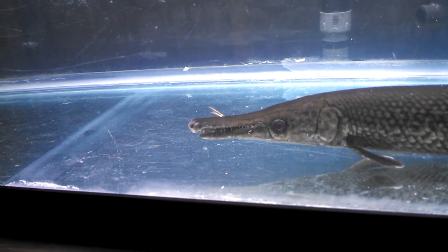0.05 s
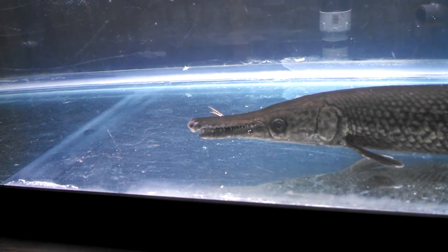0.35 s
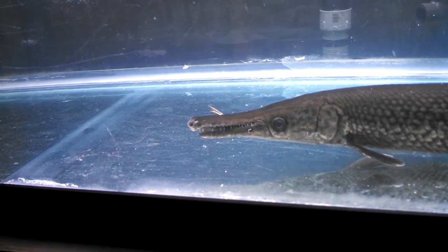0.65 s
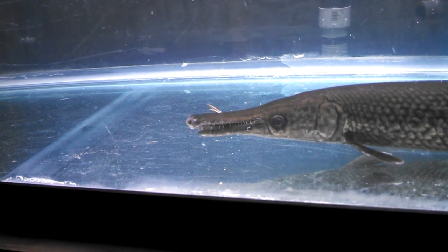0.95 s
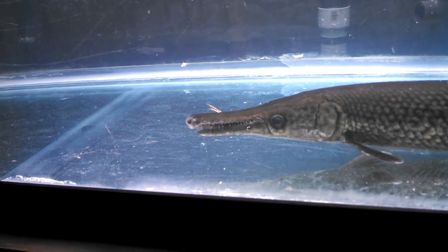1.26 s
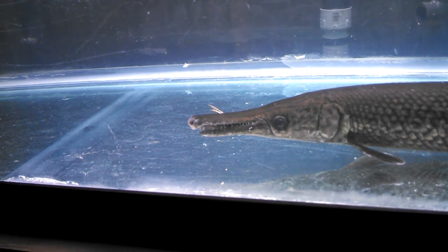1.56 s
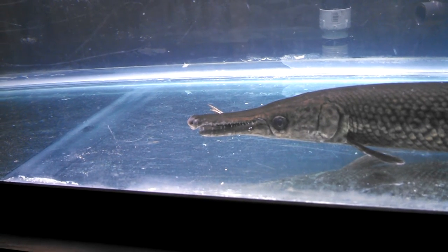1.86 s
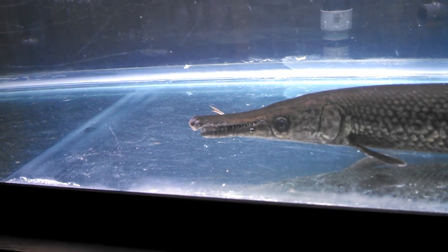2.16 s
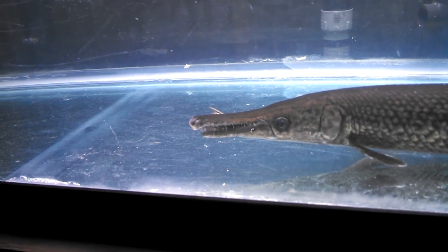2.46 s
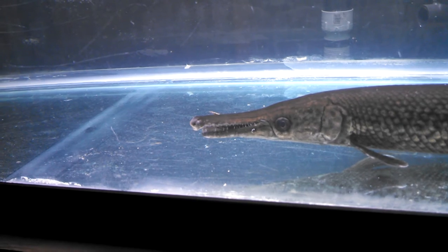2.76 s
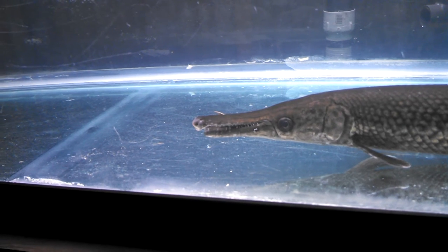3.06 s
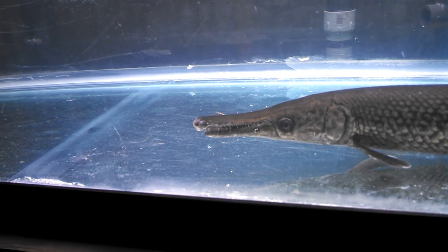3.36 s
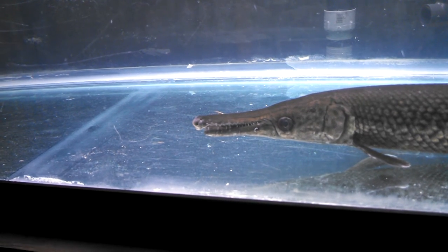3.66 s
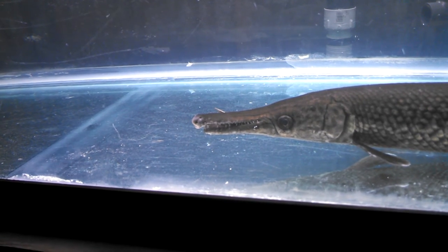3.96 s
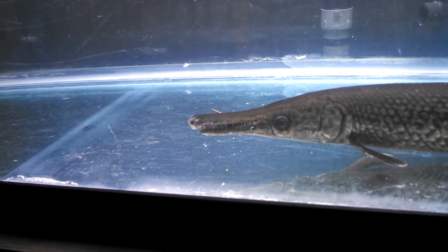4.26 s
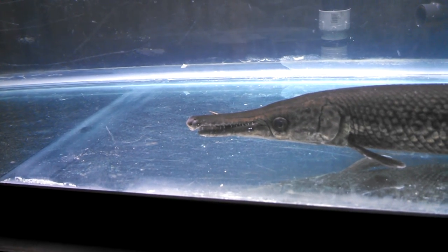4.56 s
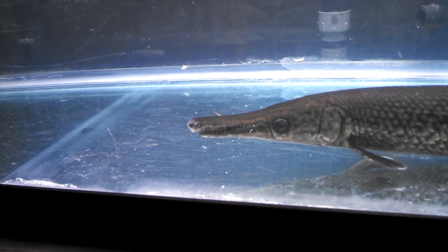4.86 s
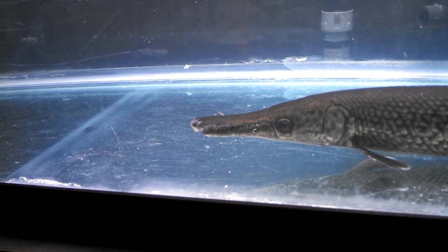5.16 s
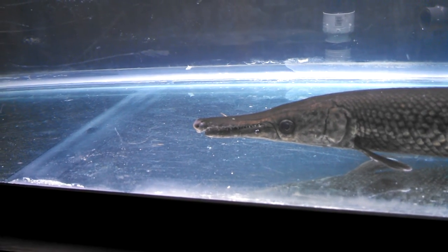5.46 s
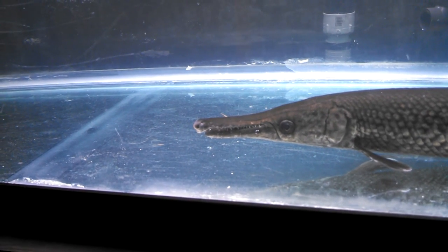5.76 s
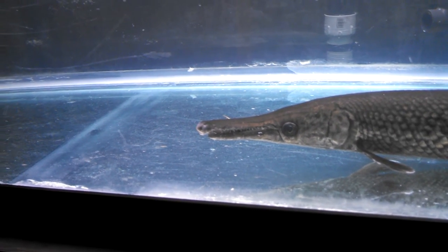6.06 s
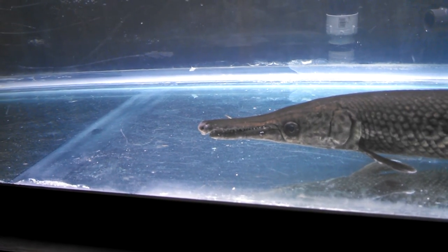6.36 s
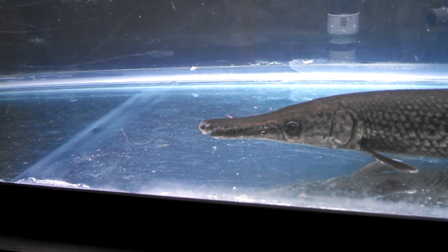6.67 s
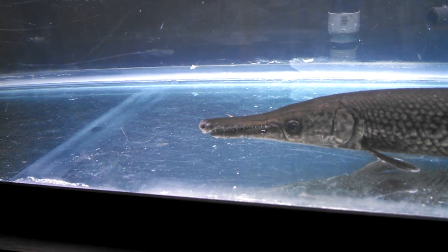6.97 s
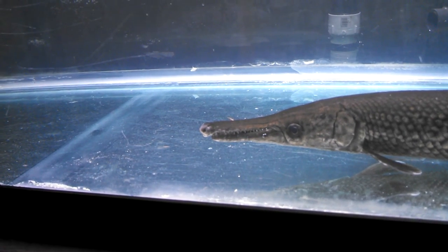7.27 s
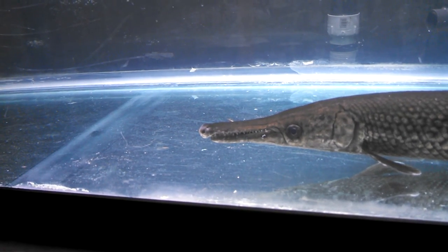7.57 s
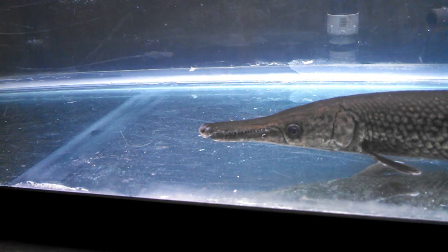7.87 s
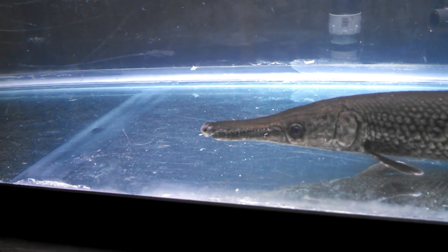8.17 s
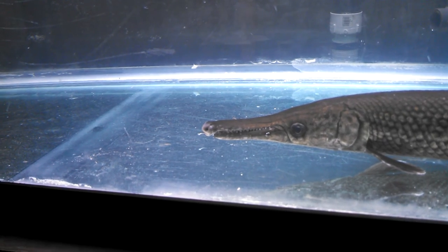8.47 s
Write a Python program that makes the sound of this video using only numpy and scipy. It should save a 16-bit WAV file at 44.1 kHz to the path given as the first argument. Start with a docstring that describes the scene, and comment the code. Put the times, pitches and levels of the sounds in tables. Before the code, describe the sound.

An aquarium filter runs without a break for about eight and a half seconds in a quiet room, heard close up in wide stereo. The pump holds a steady low electric hum with a faint, wavering chatter against the tank. Over it, the outflow makes an even rush of churning water and a bright, prickly fizz of tiny bursting bubbles. Small bubbles plop irregularly throughout, and spray gives brief, faint spits of hiss. The loudest plops come in quick clusters at about 4.7 and 5.8 seconds. Underneath, a low room rumble swells softly near 0.8 seconds, again near 4.3 seconds and once more around 7 seconds. The top of the fizz brightens slightly just after 8 seconds, while the hum and water carry on at the same level to the end.

```python
"""An aquarium filter runs in a quiet room. From the start its mains-driven pump hums and chatters faintly
against the tank, while the outflow rushes and fizzes under the hood, bubbles plop and spray spits.
The room's low rumble swells near 0.8 s and 4.3 s; the loudest plops cluster around 4.7 s and 5.8 s.
The rumble swells again near 7 s, and the top of the fizz brightens a little just after 8 s.
All is heard through two close microphone ports, widened by a delayed cross-feed."""
import sys
import numpy as np
from scipy import signal
from scipy.fft import rfft, irfft, next_fast_len
from scipy.io import wavfile
from scipy.ndimage import map_coordinates

SR = 44100
rng = np.random.default_rng(int(sys.argv[2]) if len(sys.argv) > 2 else 0)


def transcribe(signal):
    """Save signal, clipped to [-1, 1], as a 16-bit WAV file at the path in sys.argv[1]."""
    frames = np.atleast_2d(signal).T
    limited = np.clip(frames, -1, 1)
    pcm = np.round(limited * 32767).astype(np.int16)
    wavfile.write(sys.argv[1], SR, pcm)


N = 375727
MAINS_HZ = 60.02


def amp(db):
    """Decibels to gain."""
    return 10 ** (np.asarray(db) / 20)


def unit(x):
    """Scale to rms 1."""
    return x / np.sqrt(np.mean(x ** 2) + 1e-20)


def along(points, hz):
    """Read a curve of (frequency, value) points on a log frequency axis."""
    f, v = np.transpose(points)
    return np.interp(np.log(hz + 1), np.log(f + 1), v)


def wobble(per_s):
    """A smooth random modulator with per_s knots a second."""
    return map_coordinates(rng.standard_normal(int(N * per_s / SR) + 4), [np.arange(N) * per_s / SR])


def filtered(x, response):
    """EQ x with a gain given as a function of frequency."""
    m = next_fast_len(N + SR // 2)
    return irfft(rfft(x, m) * response(np.fft.rfftfreq(m, 1 / SR)), m)[..., :N]


def band(hz, centre_hz, octaves):
    """A bell-shaped band-pass curve."""
    return np.exp(-(np.log2((hz + 1) / centre_hz) / octaves) ** 2)


def add(track, s, sound):
    """Mix a sound into a track at time s."""
    part = track[..., max(round(s * SR), 0):][..., :sound.shape[-1]]
    part += sound[..., :part.shape[-1]]


def at_ports(pair, colour):
    """Colour two unrelated signals and give them the stereo image of the two ports."""
    # how alike the ports sound: (frequency [Hz], correlation [-1..1])
    alike = [(30, -0.61), (60, -0.99), (125, 0.29), (250, 0.25), (500, 0.66), (900, 0.42), (2000, -0.037),
             (15000, 0.058)]
    # shading of the right port: (frequency [Hz], left over right [dB])
    shade = [(3400, 0.5), (4800, 20), (6200, 3), (9000, 2), (10300, 20), (11700, 3), (13000, 6), (14500, 5)]
    width = lambda hz: np.arccos(np.clip(along(alike, hz), -1, 1)) / 2
    mid, side = filtered(pair, lambda hz: colour(hz) * np.array([np.cos(width(hz)), np.sin(width(hz))]))
    pan = lambda hz: np.arctan(amp(along(shade, hz)))
    balance = lambda hz: np.sqrt(2) * np.array([np.sin(pan(hz)), np.cos(pan(hz))])
    return filtered(np.array([mid + side, mid - side]), balance)


def noise_bed(colour):
    """Coloured stereo noise at the ports, rms 1."""
    return unit(at_ports(rng.standard_normal((2, N)), colour))


def room(x):
    """Glass and walls scatter a sound along a different path to each port."""
    # reverb decay: (frequency [Hz], time to fall 60 dB [s])
    decay = [(200, 0.52), (1500, 0.15), (12000, 0.081)]
    hz, t, spectrum = signal.stft(rng.standard_normal((2, SR // 3)), SR, nperseg=256)
    tail = signal.istft(spectrum * amp(-60 * t / along(decay, hz)[:, None]), SR, nperseg=256)[1]
    return signal.fftconvolve(x[None], tail / np.linalg.norm(tail[0]), axes=1)[:, :N]


def ring(t, hz, cycles, rise, lead=0):
    """A bubble rings for some cycles, its pitch rising as it nears the surface."""
    age = t * hz / cycles
    phase = 2 * np.pi * hz * t * (1 + rise * age / 2) + lead
    return np.sin(phase) * np.exp(-age) * (1 - np.exp(-t * hz))


def swarm(count, low_hz, high_hz, cycles, spread_db, tilt, bubble_gain, wash, grain_samples):
    """Rushing water and bubbles from ten spots, each with its own reverb, in an even wash; rms 1."""
    t, pair = np.arange(grain_samples) / SR, np.zeros((2, N))
    for _ in range(10):
        when, pitch, strength = rng.random((count // 10, 3)).T[..., None]
        hz = low_hz * (high_hz / low_hz) ** pitch
        accent = amp(-spread_db * np.log(np.maximum(strength, np.exp(-4))))
        grains = (hz / low_hz) ** tilt * accent * ring(t, hz, cycles, rise=0.013)
        places = (when * N).astype(int) + np.arange(grain_samples)
        bubbles = unit(np.bincount(places.ravel(), grains.ravel(), N)[:N])
        pair += room(rng.standard_normal(N) + bubble_gain * bubbles)
    return unit(unit(pair) + wash * rng.standard_normal((2, N)))


def rumble():
    """Room rumble through the stand and floor drifts in level; three times a narrow band swells."""
    # tone of the rumble: (frequency [Hz], relative level [dB])
    tone = [(20, -12), (38, -10), (56, 8.5), (82, 2.5), (110, -12), (200, -46)]
    # low swells: (time [s], level at the crest [dB], centre [Hz])
    swells = [(.83, -53, 56), (4.32, -47, 54), (6.98, -49, 80.5)]
    t, swell_s = np.arange(N) / SR, 0.17
    out = amp(-52.5 + 2 * wobble(6)) * noise_bed(lambda hz: amp(along(tone, hz)))
    for s, db, centre_hz in swells:
        boom = noise_bed(lambda hz: band(hz, centre_hz, octaves=0.4))
        out += amp(db) * np.exp(-((t - s) / swell_s) ** 2) * boom
    return out


def coil_hum():
    """The pump's coil hums at mains harmonics; the impeller's uneven load shakes level and phase."""
    # hum in the room's standing waves: (mains multiple, left [dB], right [dB], left lead [rad])
    harmonics = [(1, -69, -60.5, -4), (2, -55.5, -61.5, -2.5), (3, -45.5, -47, -0.23), (4, -55, -43, 2.5),
                 (5, -44.5, -45.5, 0.34), (6, -41.5, -42, 1.77), (7, -61.5, -57, -0.5), (8, -59, -58, -1.5),
                 (9, -54, -78, 1), (10, -53.5, -60, 0.5), (11, -57.5, -75, 0), (15, -62, -61.5, -0.5)]
    t, out = np.arange(N) / SR, np.zeros((2, N))
    flutter_db = 0.9 * wobble(20)
    for multiple, left_db, right_db, lead in harmonics:
        lag = 0.34 * multiple ** 2  # the tank delays the higher harmonics more
        phase = 2 * np.pi * multiple * MAINS_HZ * t - lag + 0.1 * wobble(20)
        partial = np.array([amp(left_db) * np.sin(phase + lead), amp(right_db) * np.sin(phase)])
        out += np.sqrt(2) * amp(flutter_db + 0.62 * wobble(2.07)) * partial
    return out


def impeller_chatter():
    """The loose impeller rocks, putting wavering sidebands beside the mains harmonics."""
    # rattle tones: (mains multiple, rattle multiple, left [dB], right [dB], left lead [rad])
    sidebands = [(3, -1, -60, -56, -.5), (3, 1, -61, -57, .3), (4, 1, -65, -63, 1.6), (5, -1, -61, -63, -1),
                 (5, 1, -62, -54.5, 0), (5, 2, -64, -61, -.2), (6, -1, -56.5, -52.5, -.4),
                 (6, 1, -57.5, -70, 3), (7, -1, -58.5, -64, 1.6), (7, 1, -67, -55.5, 2.9),
                 (8, -2, -61, -61, 1.1), (7, 2, -55.5, -61, 1.7), (8, -1, -61, -60, -.5),
                 (8, 1, -58.5, -64, -.2), (8, 2, -60, -67, -1.6), (10, 2, -60, -64, .2)]
    rattle_hz = 15.72
    t, out = np.arange(N) / SR, np.zeros((2, N))
    for multiple, side, left_db, right_db, lead in sidebands:
        hz = multiple * MAINS_HZ + side * rattle_hz
        phase = 2 * np.pi * (hz * t + rng.random()) + np.array([[lead], [0]]) + 0.39 * wobble(1.44)
        out += np.sqrt(2) * amp([[left_db], [right_db]]) * amp(1.3 * wobble(1.98)) * np.sin(phase)
    return out


def housing_drone():
    """Water drones steadily in the pump housing."""
    # tone of the drone: (frequency [Hz], relative level [dB])
    tone = [(60, -43), (105, -4), (130, -7.5), (168, 2.5), (215, -2), (230, -4.5), (246, 2), (270, -5),
            (340, -0.5), (400, -7), (470, -8), (600, -4), (1200, -26.5)]
    return amp(-41.5) * noise_bed(lambda hz: amp(along(tone, hz)))


def spray():
    """Spray spits in short bursts of hiss: a few clear ones among many faint ones of random pitch."""
    # clear spits: (time [s], level before trim [dB], centre [Hz], length [s], width [octaves])
    spits = [(0.09, -46, 5500, .025, .35), (0.185, -34.5, 12500, .04, 0.54),
             (0.185, -35.5, 4500, .025, 0.54), (.557, -36, 13000, .025, .4), (2.331, -35, 8000, 0.032, .6),
             (2.38, -35, 12000, 0.046, .6), (2.654, -36, 7500, 0.026, 0.41), (2.66, -42, 3900, 0.022, .25),
             (3.923, -32, 7000, 0.029, 1.7), (4.244, -33, 5400, 0.025, 0.6),
             (4.737, -34, 5330, 0.023, 0.28), (4.799, -38, 5800, 0.04, .25), (5.193, -33, 9200, .017, 0.24),
             (5.64, -32.5, 3500, .042, 0.41), (5.644, -35, 10000, .032, 0.58), (6.789, -37, 9000, .02, .3),
             (6.914, -38, 8500, 0.022, 0.27), (7.649, -37.5, 10200, .015, .2), (8.0, -37, 15000, .012, .2)]
    faint_per_s, low_hz, high_hz, trim_db = 22, 6000, 14000, -7
    t, out = np.arange(4096) / SR, np.zeros((2, N))
    bins_hz = np.fft.rfftfreq(len(t), 1 / SR)
    faint = []
    for when, strength, pitch in rng.random((faint_per_s * N // SR, 3)):
        db = -46.5 - np.log(max(strength, 0.05))
        faint.append((when * N / SR, db, low_hz * (high_hz / low_hz) ** pitch, 0.011, 0.3))
    for s, db, hz, length, octaves in list(spits) + faint:
        hiss = unit(irfft(rfft(rng.standard_normal((2, len(t)))) * band(bins_hz, hz, octaves)))
        age = 3 * t / length
        add(out, s, amp(db + trim_db) * age * np.exp(1 - age) * hiss)
    return at_ports(out, lambda hz: 1)


def plops():
    """Large bubbles gurgle at different places on the surface; each sheds three smaller ones."""
    # large bubbles: (time [s], level before the mix [dB], pitch [Hz], left lead [rad])
    bubbles = [(0.079, -35.5, 3293, -2.1), (0.243, -35, 1167, 0.1), (0.347, -37, 1417, 0),
               (0.396, -35, 1159, 0), (1.694, -37.5, 1186, -0.1), (1.881, -37, 1380, 0),
               (2.074, -36.5, 1633, 0.2), (2.704, -34.5, 1022, 0.2), (2.74, -34.5, 970, 0.2),
               (2.767, -36, 1288, -0.1), (3.022, -33, 3746, 0), (3.045, -34.5, 1030, 0.4),
               (3.128, -37.5, 1355, 0), (3.22, -36, 1633, 0.6), (3.593, -32.5, 1003, 0.6),
               (3.608, -34.5, 1202, 0), (4.098, -36.5, 1409, 0), (4.657, -36, 987, -0.2),
               (4.678, -36, 1440, 0), (4.7, -28, 1409, 0), (4.735, -33, 1480, 0.3),
               (4.756, -33.5, 1910, -0.5), (4.784, -34.5, 1360, 0), (4.826, -35, 1092, -0.4),
               (5.137, -38, 1527, 0), (5.362, -33, 1159, -0.1), (5.731, -36, 1398, 0),
               (5.751, -30, 1684, 1), (5.829, -29, 1073, 0), (5.84, -34, 860, 0.4),
               (5.871, -31.5, 849, 0.4), (5.92, -35, 860, 0.4), (6.163, -37, 1440, 0.3),
               (6.663, -36, 2200, 2.5), (6.887, -36, 1398, 0), (7.349, -34.5, 1918, -0.7),
               (7.519, -34, 1813, 1.4), (7.54, -35, 1400, 0), (8.097, -34, 1382, 0),
               (8.242, -36, 841, -0.3), (8.244, -35.5, 1159, -0.1)]
    shed_db, shed_span_s, shed_octaves = -10, 0.04, 0.2
    direct_db, reverb_db = -0.7, -4
    t, pair = np.arange(SR // 8) / SR, np.zeros((2, N))
    for s, db, hz, lead in bubbles:
        leads = np.array([[lead], [0]])
        add(pair, s, amp(db) * ring(t, hz, cycles=14, rise=0.003, lead=leads))
        for delay, pitch in rng.random((3, 2)):
            shed_hz = hz * 2 ** (shed_octaves * (2 * pitch - 1))
            blip = ring(t, shed_hz, cycles=7, rise=0.02, lead=leads)
            add(pair, s + shed_span_s * delay, amp(db + shed_db) * blip)
    return amp(direct_db) * pair + amp(reverb_db) * room(pair[0])


def fizz():
    """Tiny bubbles burst in a bright prickle whose top treble drifts and flickers."""
    # tone of the fizz: (frequency [Hz], relative level [dB])
    tone = [(1500, -38), (3400, 5), (4300, 1.1), (5800, -0.5), (7200, -2.5), (8700, 1), (9900, -6),
            (11000, -9.5), (12700, 2.5), (14000, 4), (15500, 0.5)]
    # fader ride on the top treble: (time [s], gain [dB])
    treble_ride = [(0, -0.5), (2.8, -0.5), (3.3, -1.5), (4, -0.5), (4.5, -1.5), (5.1, -0.5), (6.2, -1.5),
                   (7.6, -.1), (8.2, 2), (8.52, 0)]
    prickle = swarm(count=4000, low_hz=4980, high_hz=15400, cycles=2.2, spread_db=4, tilt=0.4,
                    bubble_gain=0.43, wash=0.55, grain_samples=200)
    sizzle = unit(at_ports(prickle, lambda hz: amp(along(tone, hz))))
    top = filtered(sizzle, lambda hz: hz > 10400)
    top_db = np.interp(np.arange(N) / SR, *np.transpose(treble_ride)) + wobble(30)
    return sizzle + (amp(top_db) - 1) * top


def churn():
    """Churning water full of small bubbles rings the air space under the hood."""
    # tone of the rushing water: (frequency [Hz], relative level [dB])
    tone = [(60, -49), (150, -4.5), (400, -8.5), (600, 0.5), (700, 0.5), (900, -1), (1300, -3.5),
            (1650, -4.5), (2000, -3), (2700, -3.5), (4200, -22), (8000, -21)]
    # peaks and dips of the air under the hood: (centre [Hz], width [Hz], gain [dB])
    hood = [(602, 20, 3), (689, 30, -4), (790, 40, -1.5), (850, 40, 0.5), (932, 26, 2.5), (995, 30, 1),
            (1085, 24, 1.2), (1119, 26, -3.5), (1165, 50, 1.5), (1313, 40, -3), (1405, 30, 5),
            (1625, 30, 2), (1755, 60, -2.5), (1797, 24, 3.5), (1991, 60, 2.5), (2101, 26, 2.5),
            (3505, 40, 4)]
    hood_db = lambda hz: sum(db / (1 + (2 * (hz - centre) / width) ** 2) for centre, width, db in hood)
    water = swarm(count=6000, low_hz=799, high_hz=3405, cycles=8, spread_db=2, tilt=0.89,
                  bubble_gain=0.4, wash=0.8, grain_samples=1400)
    return unit(at_ports(water, lambda hz: amp(along(tone, hz) + hood_db(hz))))


def outflow():
    """Churn and fizz surge gently together with the stream, each with a quicker flicker of its own."""
    surge_db = -0.5 * wobble(3.92)
    rush, sizzle = churn(), fizz()
    rush_db = -38 + surge_db + 0.4 * wobble(16)
    sizzle_db = -41 + surge_db + 1.26 * wobble(30)
    return amp(rush_db) * rush + amp(sizzle_db) * sizzle


def scene():
    """Pump, water and the room's rumble at the two ports."""
    pump = coil_hum() + impeller_chatter() + housing_drone()
    return pump + outflow() + plops() + spray() + rumble()


def record(dry):
    """Above the bass each channel loses a delayed copy of the other, widening the image; then a high cut."""
    # cross-feed amount: (frequency [Hz], share [0..1])
    cross_feed = [(500, 0), (1400, 1)]
    delay_samples, high_cut_hz = 16, 15520
    share = lambda hz: along(cross_feed, hz)
    wide = dry - filtered(dry[::-1], lambda hz: share(hz) * np.exp(-2j * np.pi * hz * delay_samples / SR))
    lean_right = 0.11 * np.array([[-1], [1]]) * wide.mean(axis=0)
    return filtered(wide + lean_right, lambda hz: (hz < high_cut_hz) / np.sqrt(1 + share(hz) ** 2))


dry = scene()
out = record(dry)
transcribe(out)
```